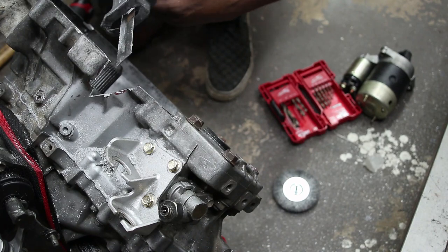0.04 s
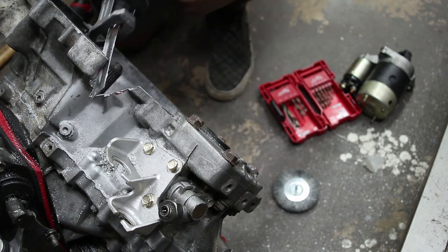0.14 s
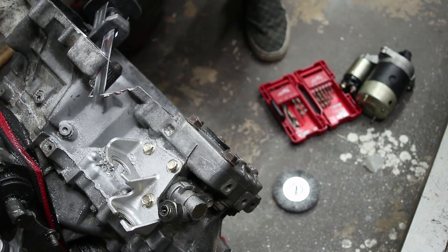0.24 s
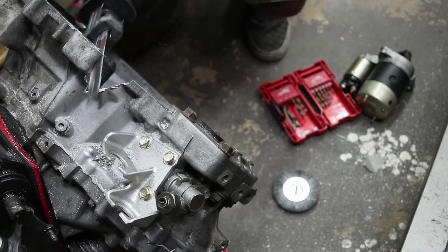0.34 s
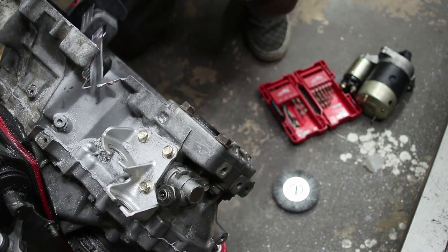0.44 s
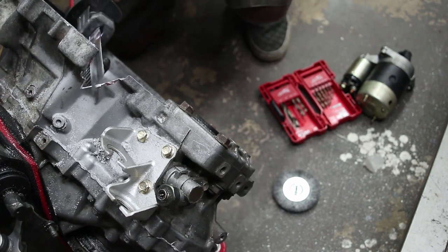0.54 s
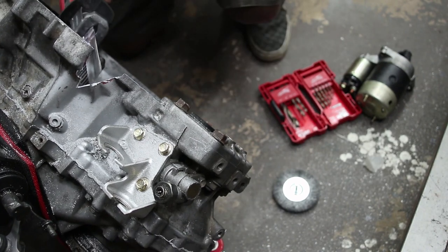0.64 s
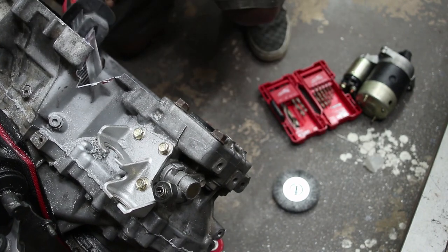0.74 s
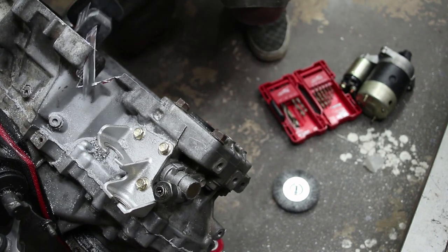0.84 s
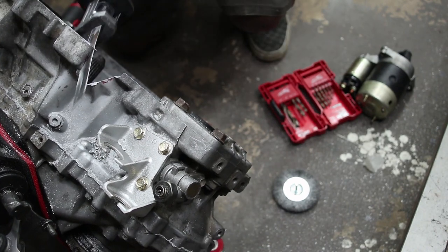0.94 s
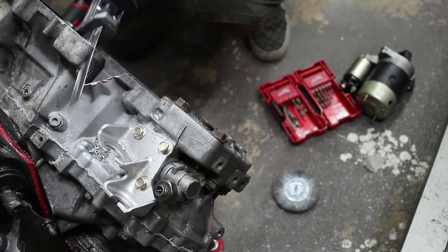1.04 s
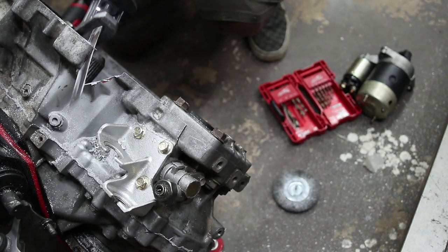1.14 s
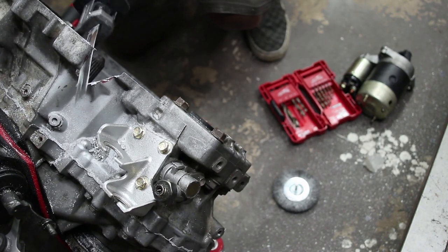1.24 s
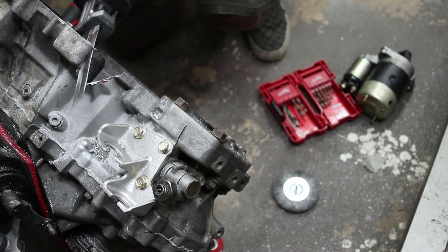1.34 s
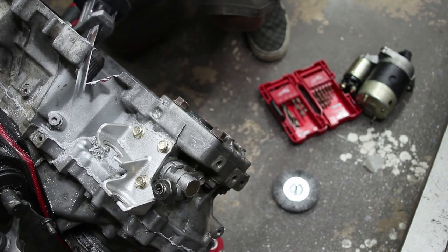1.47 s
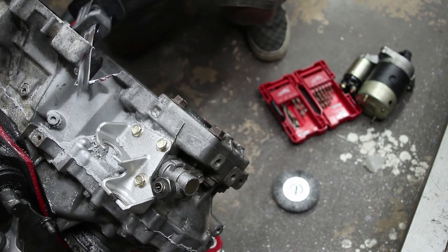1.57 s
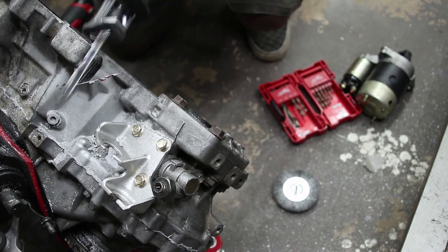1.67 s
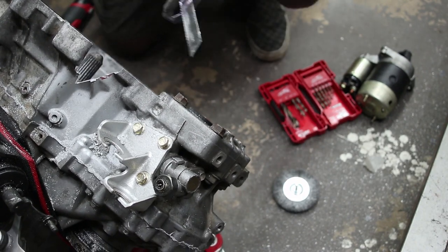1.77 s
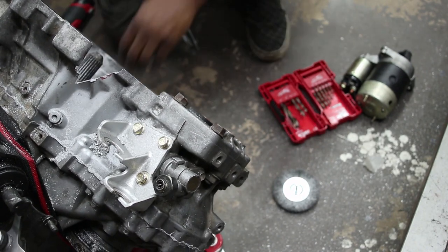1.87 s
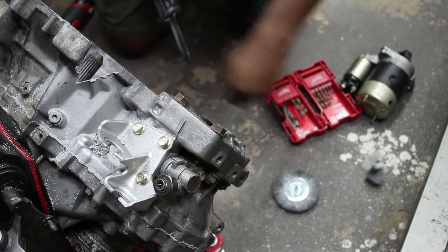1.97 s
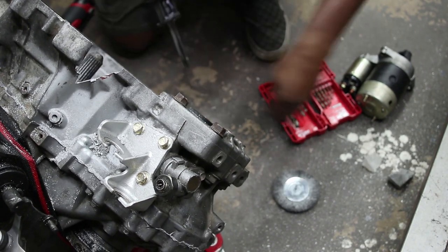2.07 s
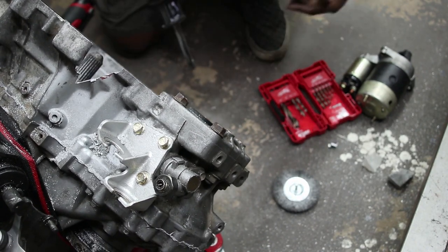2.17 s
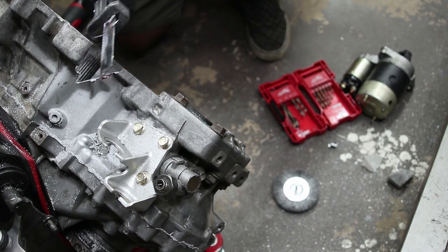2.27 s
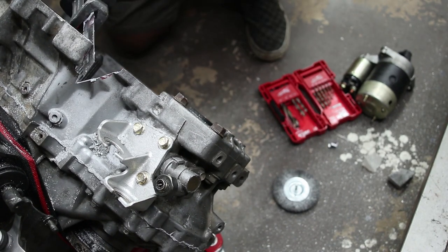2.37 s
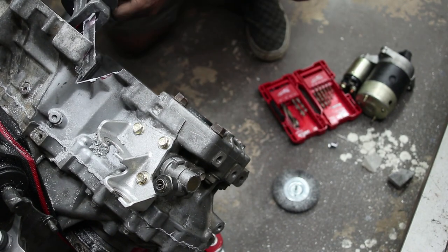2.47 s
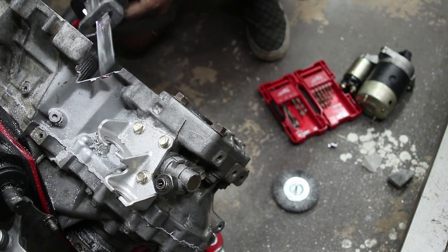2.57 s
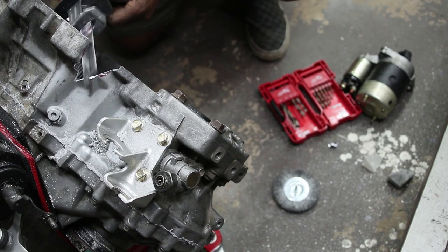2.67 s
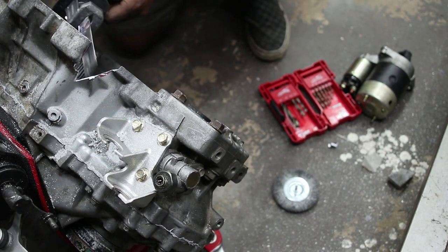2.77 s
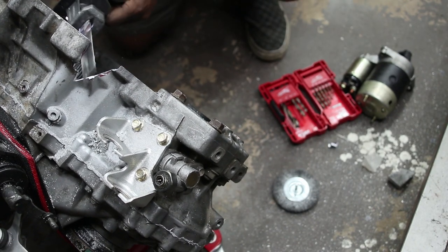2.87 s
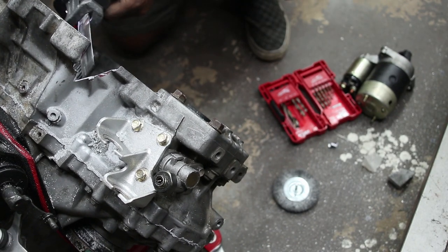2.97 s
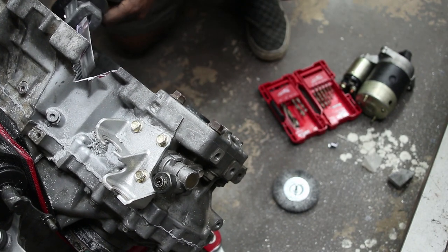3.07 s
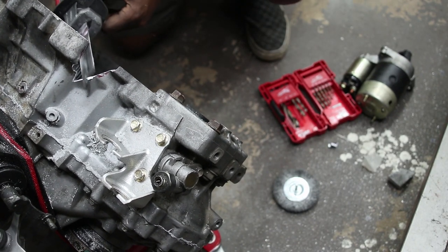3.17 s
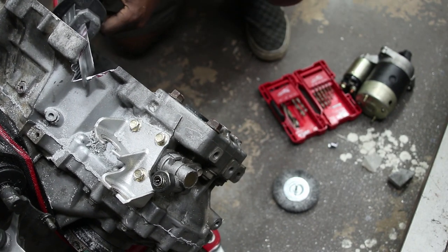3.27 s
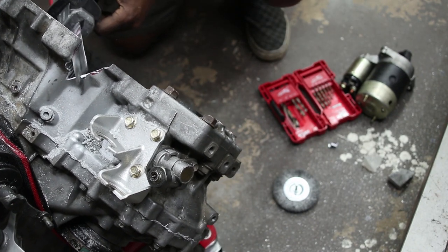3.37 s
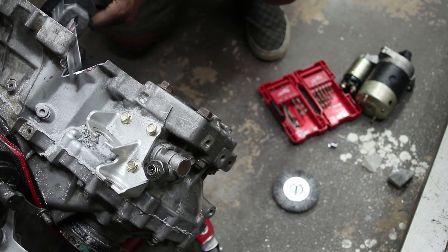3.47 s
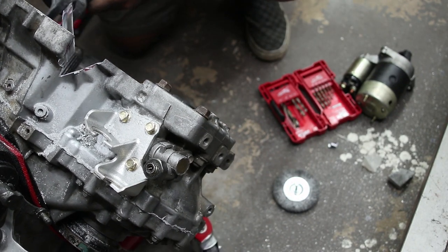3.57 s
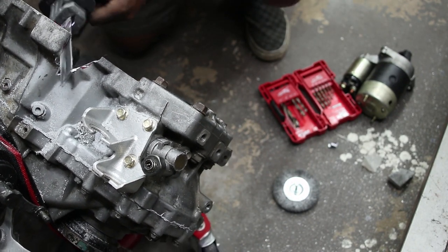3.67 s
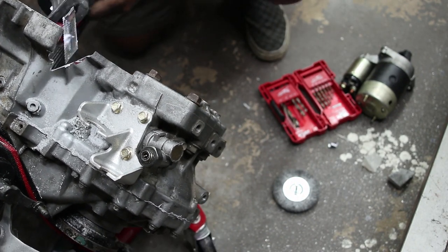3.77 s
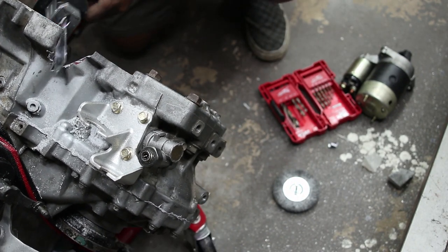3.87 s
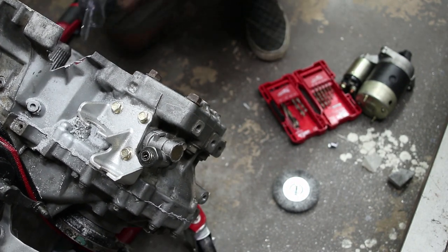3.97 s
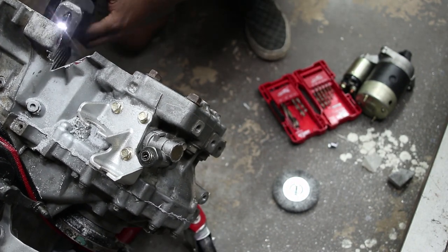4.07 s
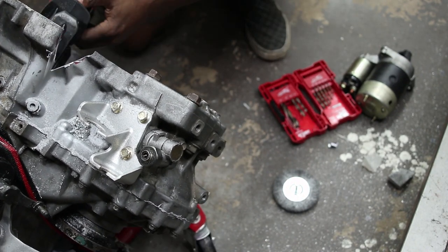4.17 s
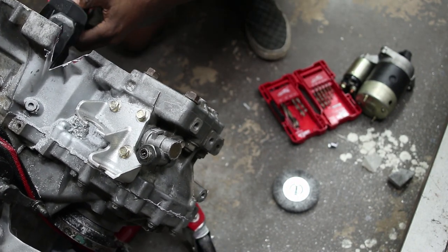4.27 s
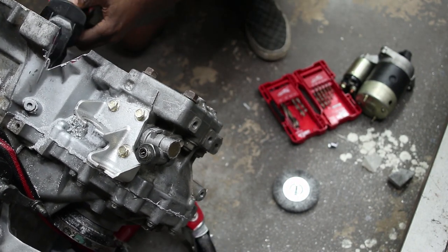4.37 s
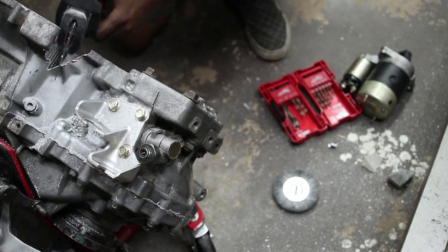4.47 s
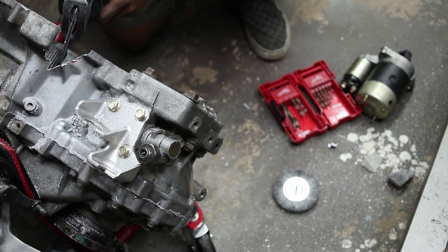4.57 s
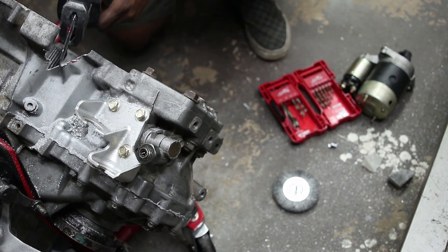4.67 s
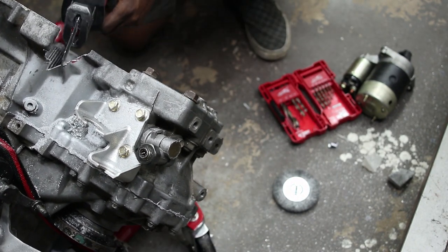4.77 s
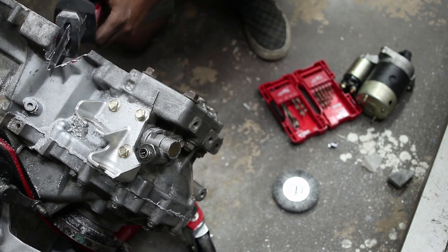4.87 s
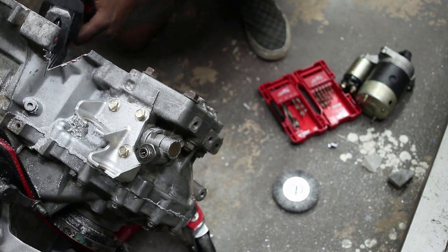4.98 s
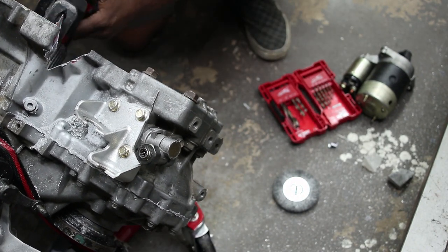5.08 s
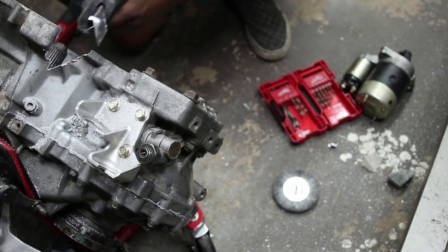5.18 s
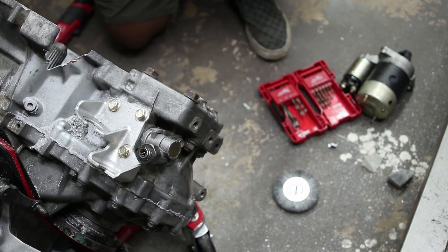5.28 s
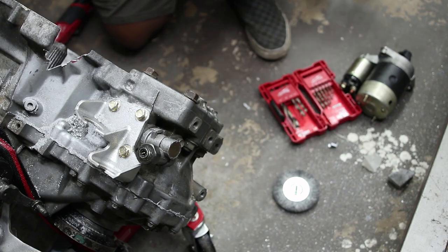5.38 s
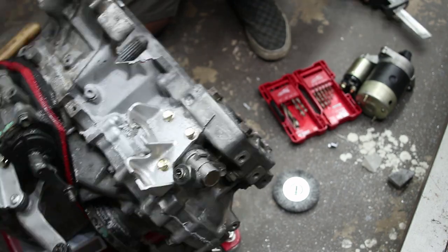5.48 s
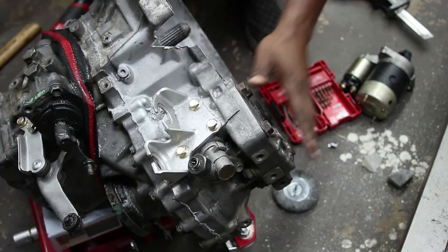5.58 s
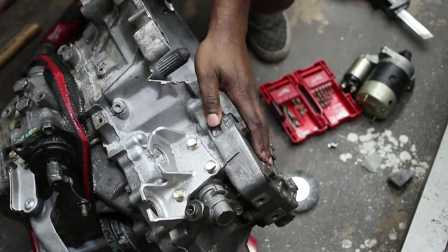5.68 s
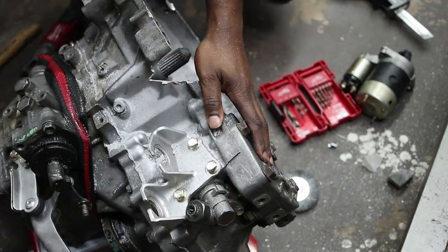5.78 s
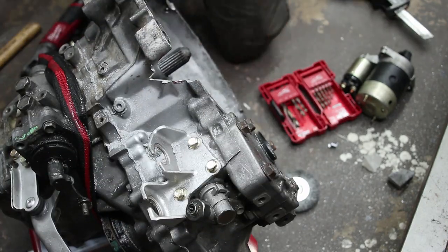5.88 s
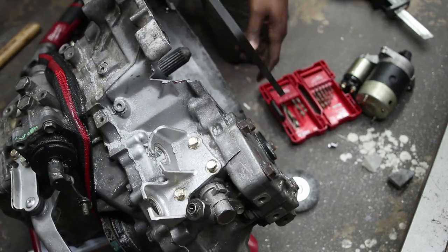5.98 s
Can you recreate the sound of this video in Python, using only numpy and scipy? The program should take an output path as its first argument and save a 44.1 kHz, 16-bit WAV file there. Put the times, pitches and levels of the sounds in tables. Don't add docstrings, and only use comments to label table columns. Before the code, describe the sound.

Buzzing, scraping saw cuts into a ringing metal housing, two long and three brief, followed by quiet clicks and two sharp metallic clacks in a garage.

```python
import sys
import numpy as np
from scipy import signal
from scipy.fft import rfft, irfft, next_fast_len
from scipy.io import wavfile
from scipy.ndimage import uniform_filter1d, map_coordinates

SR = 44100
rng = np.random.default_rng(int(sys.argv[2]) if len(sys.argv) > 2 else 0)


def ratio_of_db(decibels):
    return 10 ** (np.asarray(decibels, float) / 20)


def to_wav(s):
    ch = np.atleast_2d(s).T
    pcm = np.round(np.clip(ch, -1, 1) * 32767)
    wavfile.write(sys.argv[1], SR, pcm.astype(np.int16))


N = 265482
T = np.arange(N) / SR

# [start/s, end/s, extra bite as the teeth catch/dB, casting tone lost as the blade lifts out/dB]
RUNS = [
    (0.165, 0.317, 4, 0),
    (0.347, 1.661, 4, 10.5),
    (2.414, 3.676, 2.5, 22),
    (3.738, 3.753, 2, 3),
    (4.067, 4.301, -1, 9),
]


def unit(x, lo_hz, hi_hz):
    spectrum, hz = rfft(x.mean(0)), np.fft.rfftfreq(N, 1 / SR)
    band = spectrum[(hz > lo_hz) & (hz < hi_hz)]
    return x / np.sqrt(2 * np.sum(abs(band) ** 2) / N ** 2)


def along(points, hz):
    f, v = np.transpose(points)
    return np.interp(np.log(hz + 1), np.log(f + 1), v)


def wobble(rate):
    coarse = T[::16]
    knots = rng.standard_normal(int(N * rate / SR) + 4)
    return np.interp(T, coarse, map_coordinates(knots, [coarse * rate]))


def patches(shape, bins, frames):
    field = uniform_filter1d(rng.standard_normal(shape), bins, axis=0)
    field = uniform_filter1d(field, frames, axis=1)
    return field / field.std()


def filtered(x, response):
    m = next_fast_len(x.shape[-1] + SR // 2)
    return irfft(rfft(x, m) * response(np.fft.rfftfreq(m, 1 / SR)), m)[..., :x.shape[-1]]


def peak(hz, centre_hz, width_hz):
    return 1j * hz * width_hz / (centre_hz ** 2 - hz ** 2 + 1j * hz * width_hz)


def repeating(x, share):
    frame_s = 2048 / 48000
    return filtered(x, lambda hz: 1 / (1 - share * np.exp(-2j * np.pi * hz * frame_s)))


def stereo(pair, side_db, tied):
    z = signal.stft(pair[0], nperseg=512)[2]
    turned = 1j * z * np.tanh(2 * patches(z.shape, bins=8, frames=40))
    drift = signal.istft(turned, nperseg=512)[1][:N]
    side = np.sqrt(tied) * 1.22 * drift + np.sqrt(1 - tied) * pair[1]
    side = filtered(side, lambda hz: ratio_of_db(along(side_db, hz)))
    return np.array([pair[0] + side, pair[0] - side])


def burst(t, t60, rise):
    return (1 - np.exp(-(t / rise) ** 2)) * ratio_of_db(-60 * t / t60)


def add(out, s, sound, pan_db):
    room = out[:, round(s * SR):][:, :sound.shape[1]]
    room += (sound * ratio_of_db([[pan_db / 2], [-pan_db / 2]]))[:, :room.shape[1]]


def garage():
    # [f/Hz, level/dB per Hz]
    air_spectrum = [(22, -8), (60, -5.5), (150, -5), (350, -8), (500, -4.5), (900, -5.5), (1500, -5.5),
                    (2270, -10.5), (3600, -12), (4100, -18), (6700, -22), (7200, -30.5), (10000, -35.5),
                    (15500, -44)]
    # [f/Hz, side over mid/dB]
    air_side = [(60, -7), (110, -16), (200, -9.5), (380, -17), (700, -10), (1290, -16), (2380, -11),
                (4400, -7), (8120, -0.5), (15000, 2)]
    # [multiple of its rate, level/dB]
    hum_orders = [(1, -79), (3, -69), (4, -75), (7, -79), (8, -65), (10, -72.5), (12, -73), (13, -75),
                  (14, -66), (15, -78), (17, -90)]
    # [t/s, level/dB]
    hum_swell = [(0, 1), (2, -4), (4, -1.5), (4.9, 1), (5.35, -1), (5.5, -4), (6.02, -3)]
    air_db, hum_hz = -57.5, 63.46
    air = repeating(rng.standard_normal((2, N)), share=0.38)
    air = filtered(air, lambda hz: ratio_of_db(along(air_spectrum, hz)))
    air = ratio_of_db(air_db + 0.7 * wobble(12)) * unit(stereo(air, air_side, tied=0.5), 300, 3000)
    hum = np.zeros(N)
    for k, db in hum_orders:
        phase = 2 * np.pi * k * hum_hz * T + 0.17 * wobble(11)
        hum += ratio_of_db(db + 1.5 * wobble(4.12)) * np.sin(phase)
    hum *= ratio_of_db(np.interp(T, *np.transpose(hum_swell)))
    duck_db = sum(-5 * np.exp(-np.maximum(T - end, 0) / 0.055) * (T > start) for start, end, *_ in RUNS)
    return ratio_of_db(duck_db) * (air + hum)


def thumps():
    # [t/s, f/Hz, level/dB, half length/s]
    footfalls = [
        (4.8, 32.2, -59, .03),
        (5.08, 45, -61, .04),
        (5.17, 29.8, -66, .03),
    ]
    return sum(ratio_of_db(db) * np.exp(-((T - s) / half) ** 2) * np.sin(2 * np.pi * hz * T)
               for s, hz, db, half in footfalls)


def taps():
    # [t/s, peak level/dB, pan to the left/dB, halved below]
    landings = [
        (5.3744, -15.5, 9),
        (5.656, -12.5, 5),
    ]
    # [f/Hz, level/dB, t60/s]
    part_modes = [
        [(780, -15.5, 0.028), (2090, -10, 0.03), (2840, -8, 0.03), (3210, -11, 0.023), (3700, -8, .03),
         (4020, -3.5, 0.03), (4420, -10, 0.028), (4900, -2.5, 0.041), (5830, -4, 0.023), (6380, 0, 0.037),
         (8130, -10, 0.019), (9000, -18, .015), (9535, -18.5, 0.049), (10700, -21, .03), (12600, -28, .025)],
        [(740, -11, 0.025), (1490, 5.5, 0.024), (2100, 13, 0.02), (2710, 1.5, 0.026), (3100, -7, 0.03),
         (3800, -3, .02), (4010, 8.5, 0.015), (5245, -3, 0.018), (6357, -21, 0.022), (7000, -28, 0.022)],
    ]
    crack_levels, haze_levels, rises_s = [9, 13], [-17, -12], [0.002, 0.006]
    out, t = np.zeros((2, N)), np.arange(SR // 5) / SR
    for (s, db, pan_db), modes, crack_db, haze_db, rise in zip(
            landings, part_modes, crack_levels, haze_levels, rises_s):
        ring = np.zeros(len(t))
        for hz, level, t60 in modes:
            rough = ratio_of_db(2 * np.interp(t, np.arange(60) / 300, rng.standard_normal(60)))
            tone = np.sin(2 * np.pi * (hz * t + rng.random()))
            ring += ratio_of_db(level) * rough * burst(t, t60, rise) * tone
        grit = rng.standard_normal(len(t)) + 0.42 * rng.standard_normal((2, len(t)))
        grit *= ratio_of_db(crack_db) * burst(t, 0.017, rise) + ratio_of_db(haze_db) * burst(t, 0.044, 0.0074)
        grit = filtered(grit, lambda hz: peak(hz, 2900, 4500) ** 4)
        add(out, s - rise / 2, ratio_of_db(db - 8) * (ring + grit), pan_db / 2)
    return out


def clicks():
    # [t/s, peak level/dB, colour f/Hz, thud
    # level/dB, sizzle level/dB]
    small_contacts = [(.005, -45, 3500, -19, -19), (0.06, -33, 2380, -9.5, -16), (.149, -40, 2500, -11, -12),
                      (1.8853, -21.5, 3930, -24, -25.5), (1.909, -42, 4000, -26, -32),
                      (1.931, -30, 4330, -33, -32), (2.0082, -51, 2330, -15, 2), (2.2145, -41, 3600, -6, -32),
                      (2.266, -38.5, 5700, -10, -18.5), (2.284, -43, 3400, -11, -23),
                      (2.318, -30.5, 3800, -17, -23), (3.7864, -58, 2090, 2, -26),
                      (3.821, -43.5, 3580, -12, -21), (3.841, -44, 2000, -13, -27),
                      (3.8644, -33, 3160, -15, -25), (3.9584, -50.5, 3480, -23, -25),
                      (3.9788, -45.5, 2310, -10, -26), (4.0156, -45, 3530, -5, -40),
                      (4.945, -50, 2330, -18, -30), (5.004, -43, 3130, -11, -33), (5.413, -43, 2120, -25, -34),
                (5.515, -40, 4600, -24, -18), (5.535, -50, 2070, -15, -13), (5.613, -41, 5500, -11, -19),
                (5.633, -38, 3700, -17, -30), (5.8294, -56, 2950, -5, -14), (6.008, -63.5, 2440, 16.5, -25)]
    # [t/s, peak level/dB, colour f/Hz]
    rattle = [
        (5.641, -35, 2700),
        (5.704, -37, 2100),
        (5.716, -43, 2400),
        (5.735, -45, 2500),
    ]
    tool_hz = [1350, 2500, 3500, 4070, 4950, 5700, 7500]
    tool_width_hz, tool_rings = 320, 1.18
    contacts = [(*row, 2770) for row in small_contacts] + [(*row, -18, -36, 950) for row in rattle]
    out, t = np.zeros((2, N)), np.arange(SR // 10) / SR
    for s, db, colour_hz, thud_db, sizzle_db, width_hz in contacts:
        grit = rng.standard_normal((5, len(t))) * burst(t, 0.02, rise=0.0039)
        shares = rng.uniform(0, tool_rings, len(tool_hz))

        def colour(hz):
            tool = 0.69 + sum(share * peak(hz, c, tool_width_hz) for c, share in zip(tool_hz, shares))
            return tool * peak(hz, colour_hz, width_hz) ** 2 * peak(hz, 2800, 5900) ** 2

        middle = filtered(grit[0] + 0.35 * grit[1] * [[1], [-1]], colour)
        thud = ratio_of_db(thud_db + 11.5) * filtered(grit[2], lambda hz: peak(hz, 840, 1700) ** 2)
        sizzle = ratio_of_db(sizzle_db) * filtered(grit[3:], lambda hz: peak(hz, 11200, 9000) ** 2)
        add(out, s - 0.0035, ratio_of_db(db + 17.5) * (middle + thud + sizzle), pan_db=1.0)
    return out


def whine():
    # [t/s, f/Hz, level/dB]
    gear = [(2.53, 518, -33), (2.65, 517.4, -60), (2.85, 532.3, -53), (3.049, 505, -40), (3.12, 501.7, -50),
            (3.2, 505, -39), (3.32, 507, -48.5), (3.5, 520, -42), (3.62, 515, -39.5)]
    # [t/s, f/Hz, level/dB]
    shaft = [
        [(.36, 336.4, -3.5), (.5, 288.7, 1), (.75, 275.2, -6.5), (1.1, 268, -3), (1.63, 262.5, -8.5)],
        [(2.5, 318, -2), (2.65, 296, 1), (2.95, 277, -1), (3.05, 263.7, -1.5), (3.5, 281.3, 1), (3.62, 279, 1)],
    ]
    # [multiple, level/dB]
    shaft_orders = [(1, -59.5), (.725, -64.5), (.42, -65.5)]

    def tone(s, hz, db):
        level_db = np.interp(T, s, db, -120, -120) + 2.2 * wobble(9)
        turns = np.cumsum(np.interp(T, s, hz)) / SR
        return ratio_of_db(level_db) * np.sin(2 * np.pi * turns + 0.33 * wobble(30))

    s, gear_hz, gear_db = np.transpose(gear)
    out = tone(s, gear_hz, gear_db) + tone(s, 1.165 * gear_hz, gear_db - 1.5)
    for run in shaft:
        s, shaft_hz, load_db = np.transpose(run)
        for k, db in shaft_orders:
            out += tone(s, k * shaft_hz, db + load_db)
    return out


def trigger():
    rise_db_s, fall_db_s, cliff_s = 5000, 1103, 0.0023
    gates = []
    for start, end, *_ in RUNS:
        after = np.maximum(T - end, 0)
        rise = np.minimum(0, (T - start + 0.0028) * rise_db_s)
        gates.append(rise - fall_db_s * after * (1 + after / cliff_s))
    return np.max(gates, 0)


def feed(t):
    # [t/s, level/dB, load: how hard the blade drives the casting/dB]
    long_feed = [
        [(0.38, -32.5, -0.5), (0.428, -30, -2), (0.8, -32.5, -1.5), (1.32, -31, 0.5), (1.35, -31.5, 4.5),
         (1.468, -33, -2.5), (1.556, -35, 0.5), (1.608, -31, 0), (1.63, -33, -2.5)],
        [(2.45, -31.5, -0.5), (2.512, -32.5, -7.5), (2.548, -30.5, -0.5), (3.058, -33, 4), (3.244, -31, -2.5),
         (3.338, -33.5, 4), (3.456, -31, -2), (3.61, -32, 2), (3.64, -33, -0.5)],
    ]
    short_feed = [(.19, -30, -2.5), (.25, -30, -1.4), (.32, -34.5, 1), (3.747, -29.5, 0.3),
                  (4.08, -29, -2.3), (4.13, -30.5, 1.8), (4.24, -29.5, 0.45), (4.3, -33.5, -3.4)]
    # [t/s, half length/s, level/dB]
    slacks = [(0.515, 0.034, -3.5), (1.204, 0.012, -3.5), (2.924, 0.045, -4.5)]
    bite_s, lift_s, lift_fade = 0.011, 0.032, 0.2
    rows = np.vstack([*long_feed, short_feed])
    s, level_db, load_db = rows[rows[:, 0].argsort()].T
    level = np.interp(t, s, level_db)
    lift_db = 0 * t
    for start, end, bite_db, lost_db in RUNS:
        level += bite_db * np.exp(-np.maximum(t - start, 0) / bite_s) * (t > start - 0.01)
        lift_db += lost_db * np.clip(1 + (t - end) / lift_s, 0, 1) * (t < end + 0.012)
    level += sum(db * np.exp(-((t - at) / half) ** 2) for at, half, db in slacks)
    return level - lift_fade * lift_db, np.interp(t, s, load_db - load_db.mean()), lift_db


def saw():
    # [f/Hz, level/dB per Hz]
    cut_spectrum = [(60, -42), (114, -30.5), (250, -24.5), (392, -16.5), (591, -5), (672, -10.5),
                    (853, -3.5), (1060, -8.5), (1400, -5), (2210, -10), (3550, -7.5), (5720, -12),
                    (7250, -23), (15500, -26)]
    # [f/Hz, side over mid/dB]
    cut_side = [(60, -12), (110, -12), (200, -5), (380, -18.5), (700, -13), (1290, -15), (2380, -12.5),
                (4400, -7), (8120, -1), (15000, 1)]
    # [f/Hz, width/Hz, level in the first, second and last cut/dB]
    resonances = [(532, 150, 0.5, 1.6, 2.9), (603, 10, 5, 3.4, 1.1), (743.7, 47.4, 10, 8.5, 10),
                  (849, 80, 4.5, 5.4, 3.7), (977, 26, 0.5, 6.3, 2), (1215, 120, 5.5, 5.3, 1.1),
                  (1274, 73, -1.5, 5.8, 3.5), (1496, 200, 0.5, 3.7, 6), (1705, 166, 5, 4.5, 3.5),
                  (2440, 140, 5, 5.6, 3.8), (2950, 44, 0.5, 4, 1.6), (3500, 300, 5, 6.6, 7.2),
                  (4740, 200, -0.5, 5.9, 1.4), (5460, 190, 2, 1.1, 3), (5580, 220, 2.5, 5.8, 4.6),
                  (8070, 120, 7.5, 2.1, 2.5), (9730, 400, 3.5, 2.7, 4), (11760, 530, -3.5, 2.5, 2.2),
                  (13700, 390, -12, 1, 1)]
    # [t/s, half length/s, f/Hz, width/Hz, level/dB]
    surges = [(0.166, .015, 1300, 300, 6.5), (.26, 0.02, 786, 120, 7.5), (0.587, .02, 4800, 250, 8),
              (0.593, 0.076, 830, 120, 4), (1.378, 0.051, 903, 110, 15.5), (2.555, 0.021, 764, 100, 12),
              (2.742, 0.1, 4730, 300, 3), (2.902, 0.091, 2500, 120, 7), (3.466, 0.082, 4240, 500, 6),
              (3.558, .04, 1782, 148, 11), (4.126, 0.02, 787, 130, 12.5), (4.2, 0.036, 1700, 200, 0)]
    # [start/s], [chip hiss level/dB], [rumble level under the casting tone/dB]
    cut_starts = [0, 2.0, 3.71]
    hiss_levels = [-0.3, 1.25, -4.5]
    rumble_levels = [0.5, 0, 1.5]
    zones_hz = [330, 620, 1500, 3800, 10500]

    teeth = rng.standard_normal((2, N)) * ratio_of_db(1.18 * wobble(400) + 0.97 * wobble(60))
    hz, t, z = signal.stft(repeating(teeth, share=0.56), SR, nperseg=1024)
    power = uniform_filter1d(abs(z) ** 2, size=12, axis=1)
    z /= np.sqrt(uniform_filter1d(power, size=6, axis=2))

    level_db, load_db, lift_db = feed(t)
    cut = np.searchsorted(cut_starts, t, "right") - 1
    swell_db = level_db - level_db.mean()
    rumble = np.array(rumble_levels)[cut] + 0.33 * swell_db
    casting = 0.63 * load_db - lift_db
    blade = 0.61 * load_db - 0.11 * lift_db
    hiss = np.array(hiss_levels)[cut] + 0.31 * swell_db
    zone = np.interp(np.log(hz + 1), np.log(zones_hz), np.arange(len(zones_hz)))
    grid = np.meshgrid(zone, np.arange(len(t)), indexing="ij")
    colour_db = map_coordinates([rumble, casting, blade, 0 * t, hiss], grid, order=1)

    colour_db += along(cut_spectrum, hz)[:, None]
    for c, w, *db in resonances:
        ring_db = np.array(db)[cut] + 1.27 * np.interp(t, T, wobble(8))
        colour_db += abs(peak(hz, c, w))[:, None] ** 2 * ring_db
    for at, half, c, w, db in surges:
        colour_db += db * abs(peak(hz, c, w))[:, None] ** 2 * np.exp(-((t - at) / half) ** 2)
    colour_db += 0.86 * patches(z.shape[1:], bins=3, frames=9)
    scrape = signal.istft(z * ratio_of_db(colour_db), SR, nperseg=1024)[1][:, :N]
    envelope_db = feed(T)[0] + trigger() + 1.3 * wobble(24.804)
    return ratio_of_db(envelope_db) * unit(stereo(scrape, cut_side, tied=0.6), 2200, 6500)


def scene():
    return garage() + thumps() + taps() + clicks() + whine() + saw()


def top_cut(x):
    return signal.sosfilt(signal.butter(12, 16960, fs=SR, output="sos"), x)


def record(dry):
    top_hz = 15710
    limited = filtered(dry, lambda hz: np.clip((top_hz - hz) / 150 + 0.5, 0, 1))
    return top_cut(limited)


dry = scene()
out = record(dry)
to_wav(out)
```